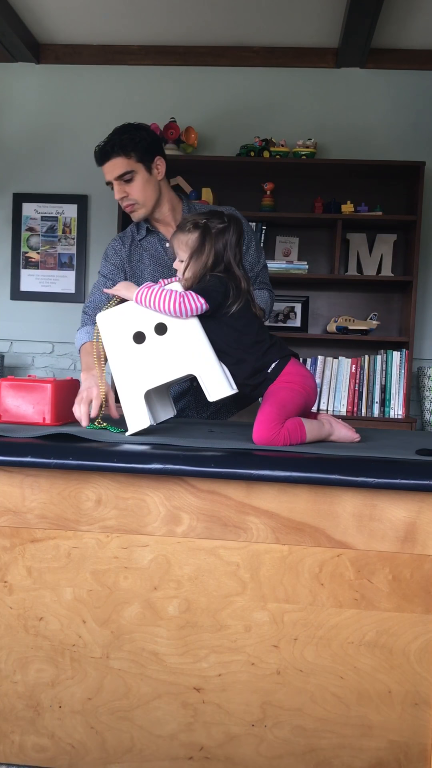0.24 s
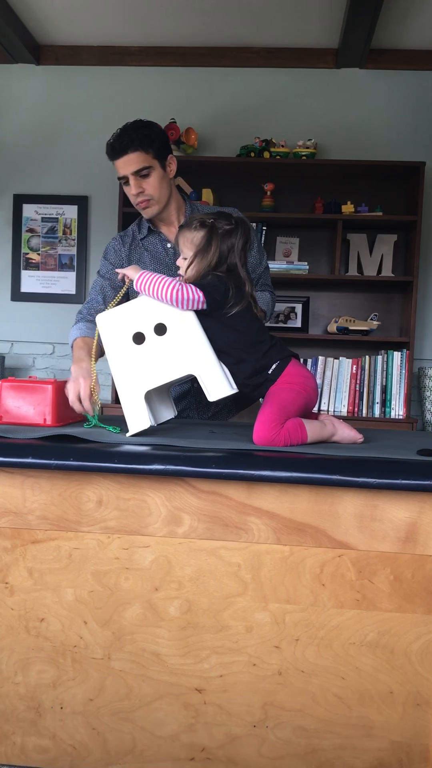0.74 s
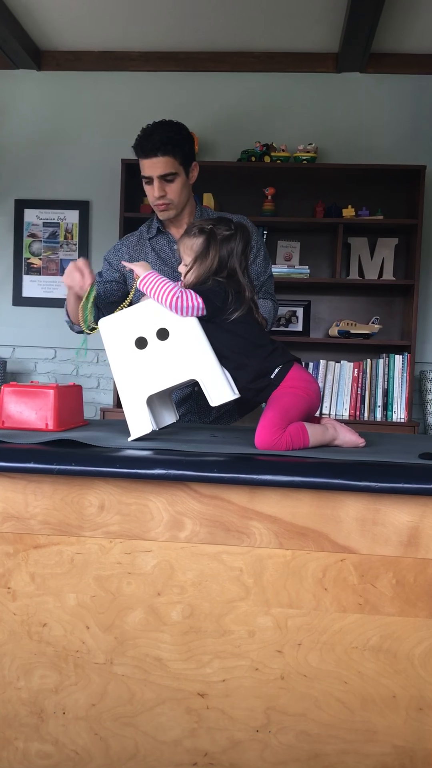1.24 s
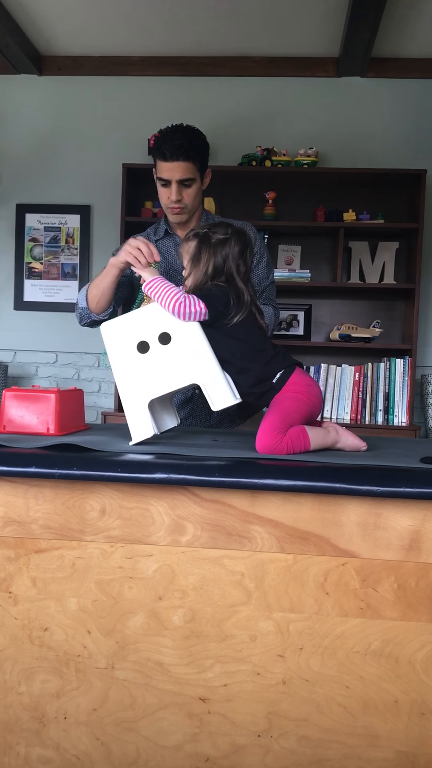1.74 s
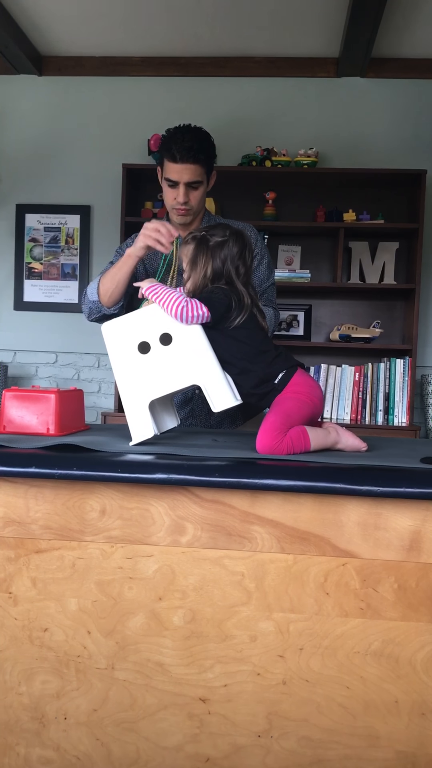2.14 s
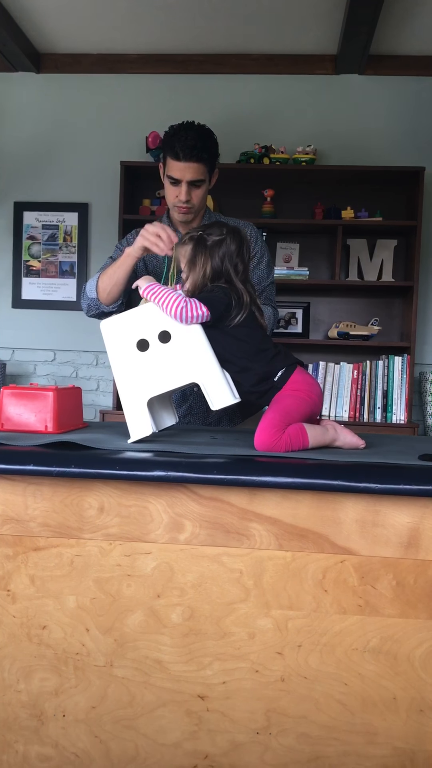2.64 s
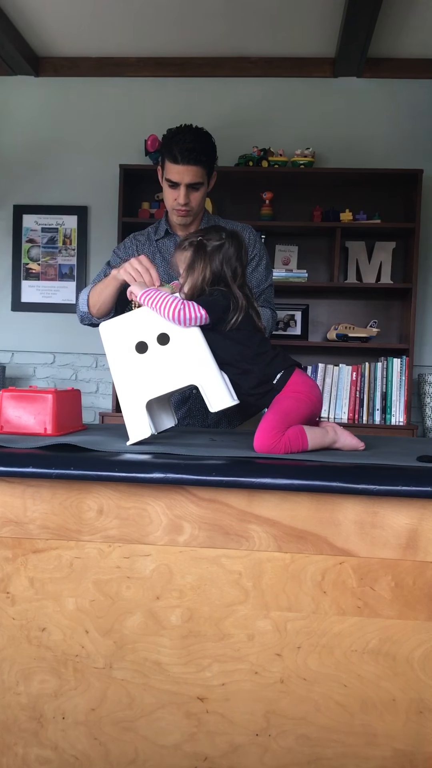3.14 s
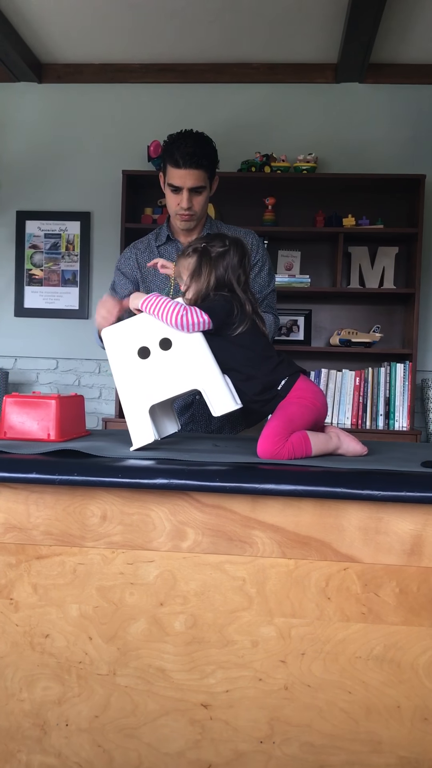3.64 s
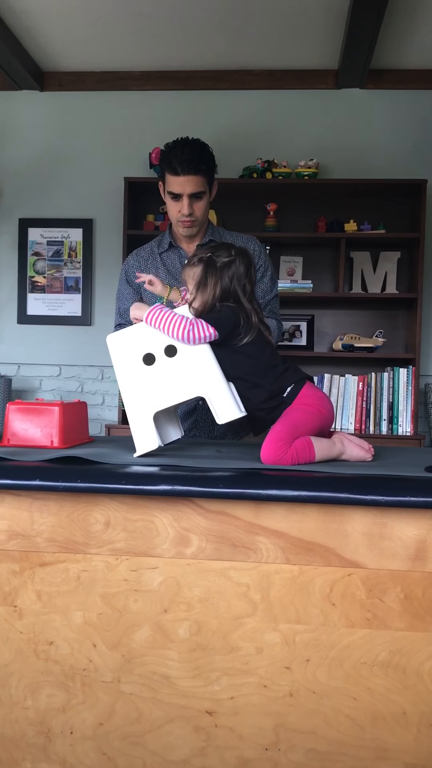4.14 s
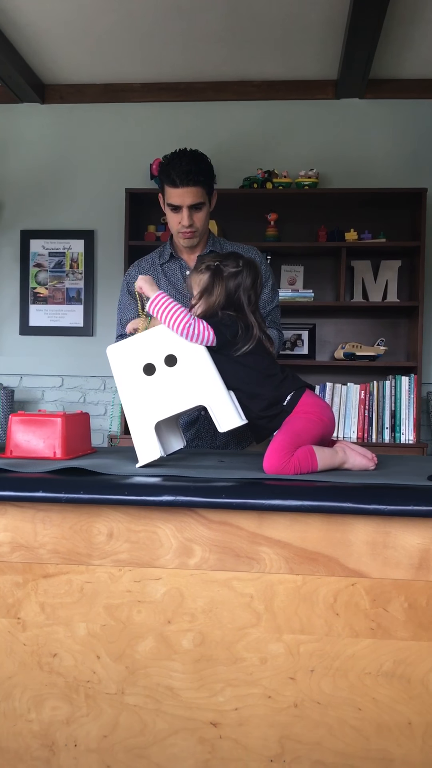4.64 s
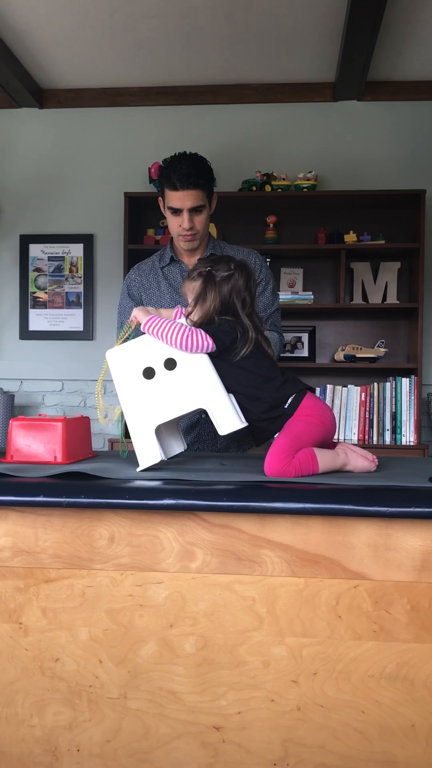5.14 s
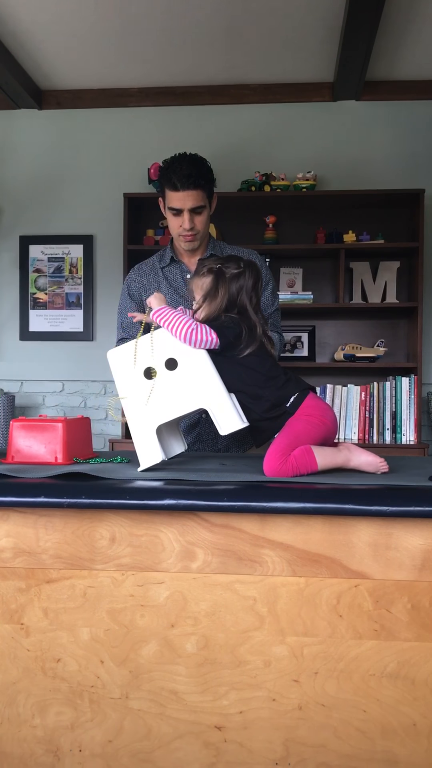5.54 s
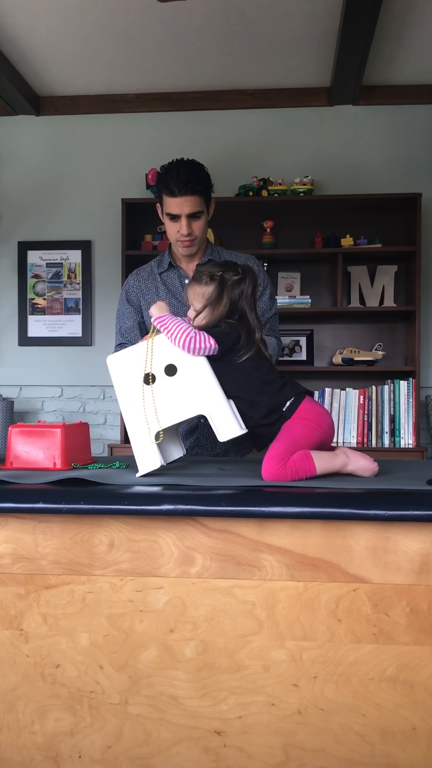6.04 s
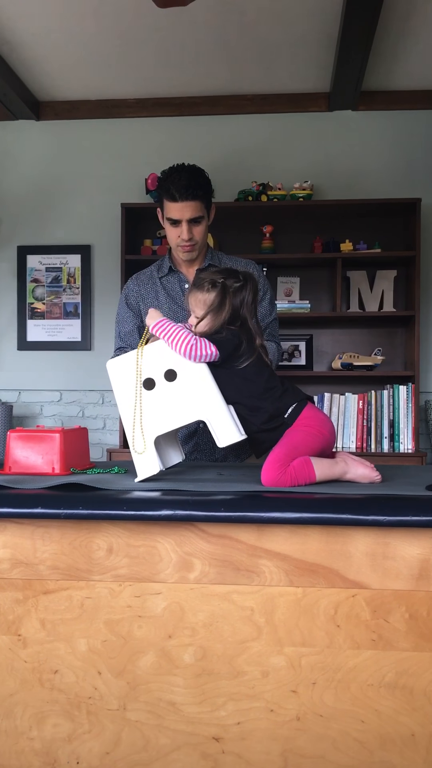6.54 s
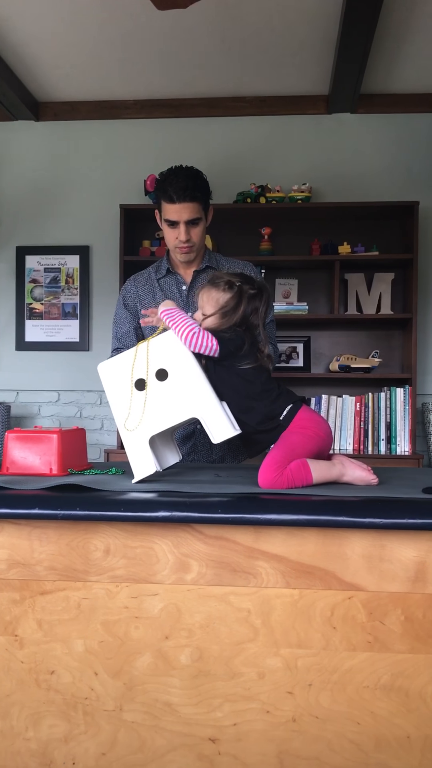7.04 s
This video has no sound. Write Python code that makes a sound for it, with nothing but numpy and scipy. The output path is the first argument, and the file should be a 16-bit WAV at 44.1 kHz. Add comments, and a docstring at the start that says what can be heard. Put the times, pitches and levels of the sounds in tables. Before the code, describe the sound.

Strings of plastic beads slide, rattle and clack on a hollow plastic stool in short clusters, a few metres away in a living room.

```python
"""Strings of beads on a hollow stool

Strings of plastic beads are drawn over a hollow plastic stool and dropped on it or its mat, a few metres away.
Each landing is a quick volley of tiny hard clicks; sliding, jostling and ticking beads are random or lone impacts.
Filters give each contact its colour, and shell modes ring under the clacks, knocks and slides.
Decaying noise smears these clicks as a live living room does, over soft bumps and a low steady rumble."""
import sys
import numpy as np
from scipy import signal
from scipy.fft import rfft, irfft, next_fast_len
from scipy.io import wavfile

SR = 44100
rng = np.random.default_rng(int(sys.argv[2]) if len(sys.argv) > 2 else 0)


def unload_wav(signal):
    """Save mono or channel-first audio to the path in sys.argv[1] as 16-bit WAV at rate SR, clipped to [-1, 1]."""
    wavfile.write(
        sys.argv[1],
        SR,
        np.round(np.clip(np.atleast_2d(signal).T, -1, 1) * 32767).astype(np.int16),
    )


N = 321038


def amp(db):
    """Decibels to amplitude ratio: 20 dB for each factor of ten."""
    return 10 ** (np.asarray(db) / 20)


def unit(x):
    """Normalisation of a signal or spectrum to rms 1."""
    return x / np.sqrt(np.mean(x ** 2) + 1e-20)


def along(points, hz):
    """Linear interpolation of (f/Hz, value) points over log frequency."""
    f, v = np.transpose(points)
    return np.interp(np.log(hz + 1), np.log(f + 1), v)


def filtered(x, response):
    """Linear filtering: the spectrum of x times a complex response of frequency."""
    padded = 2 * next_fast_len(N // 2 + SR // 4)
    spectrum = rfft(x, padded) * response(np.fft.rfftfreq(padded, 1 / SR))
    return irfft(spectrum, padded)[:N]


def resonance(f, hz, width):
    """Frequency response of one damped mode, of gain 1 at its centre; width in Hz."""
    return 1j * f * width / (hz * hz - f * f + 1j * f * width)


def coloured(x, tone, shell_db=None, size=16384):
    """Minimum-phase filtering of unit power; the modal powers of the shell add to the tone."""
    # modes of the stool's shell: f/Hz, width/Hz, level/dB (shell_db is added)
    shell_modes = [(208, 26, -2), (274, 7.7, -1), (348.7, 13, 1.5), (595, 34, -2.5), (838.5, 15, -0.5),
                   (1080, 40, 0), (1188, 31, 2), (1294, 40, -6), (1568, 44, 3), (1755, 82, -1.5),
                   (2107, 76, -3), (2325, 140, -6), (2740, 230, -5), (3040, 86, -2), (3470, 82, -5.5),
                   (4180, 77, -6.5)]
    f = np.fft.rfftfreq(size, 1 / SR)
    gain = amp(along(tone, f))
    if shell_db is not None:
        power = 1
        for hz, width, db in shell_modes:
            power = power + amp(db + shell_db) ** 2 / (1 + (2 * (f - hz) / width) ** 2)
        gain = gain * np.sqrt(power)
    # folding the cepstrum onto positive times makes the ring follow the blow
    cepstrum = irfft(np.log(unit(gain)))
    cepstrum[1:size // 2] *= 2
    cepstrum[size // 2 + 1:] = 0
    impulse_response = irfft(np.exp(rfft(cepstrum)))
    return signal.oaconvolve(x, impulse_response)[:N]


def contacts(rate, scatter_db, clump_db=2.0, clumps_per_s=70):
    """Poisson-like impacts, rate per second, whose force is random and drifts in clumps; rms 1."""
    clumps = np.interp(np.arange(N) / SR * clumps_per_s, np.arange(N), rng.standard_normal(N).clip(-2, 2))
    scatter = rng.standard_normal(N).clip(-2, 2)
    force = amp(clump_db * clumps + scatter_db * scatter) * rng.choice([-1, 1], N)
    return unit(force * (rng.random(N) < rate / SR))


def room(x, build_s=0.00046, count=3):
    """Diffuse reverberation: noise tails decay exponentially, and each bead spot excites its own."""
    # reverberation time: f/Hz, t60/s
    decay_times = [(150, 0.32), (600, 0.39), (2000, 0.33), (6000, 0.3), (10000, 0.25), (16000, 0.26)]
    hz, t, z = signal.stft(rng.standard_normal((count, SR // 2)), SR, nperseg=256)
    decay = amp(-60 * t / along(decay_times, hz)[:, None])
    tails = signal.istft(z * decay, SR)[1]
    tails *= 1 - np.exp(-np.arange(tails.shape[1]) / SR / build_s)
    tails /= np.linalg.norm(tails, axis=1, keepdims=True)
    # another spot is drawn every 48 samples
    spot = rng.integers(count, size=N)[np.arange(N) // 48]
    return sum(signal.oaconvolve(x * (spot == k), tail)[:N] for k, tail in enumerate(tails))


def background():
    """Stationary filtered noise: steady rumble and faint hiss, stronger at low room resonances."""
    # rumble and hiss spectrum: f/Hz, relative level/dB per Hz
    air_tone = [(20, -30), (30, -21), (45, -2), (115, -3), (160, -10), (260, -16.5), (330, -16.5),
                (500, -22.5), (1200, -27), (3000, -31), (6500, -35), (10400, -38.5), (12500, -36),
                (15500, -36)]
    # low room resonances: f/Hz, width/Hz of each of two passes, rms level/dB
    room_modes = [(45.3, 12, -67), (82, 12.4, -67), (105.2, 17, -69), (224, 12.3, -69.5)]
    total = amp(-61.5) * unit(coloured(rng.standard_normal(N), air_tone))
    for hz, width, db in room_modes:
        mode = filtered(rng.standard_normal(N), lambda f: resonance(f, hz, width) ** 2)
        total = total + amp(db) * unit(mode)
    return total


def pulls():
    """Amplitude envelope of sliding: each pull starts, swells or fades evenly in dB, and stops."""
    # the hand draws a string over the stool: t/s, length/s, level/dB at midway before the
    # layer's gains, swell/dB over the pull
    strokes = [(0, 0.52, -78, -11), (0.64, 0.12, -67, 2), (1.3, 0.34, -61, 6.5), (1.694, 0.066, -50, -7),
               (1.847, 0.25, -66, -5), (2.095, 0.28, -56, -8.5), (2.626, 0.11, -54, 2.5),
               (2.773, 0.37, -49, -1), (3.246, .2, -50.5, -9), (3.513, 0.15, -51, 2.5),
               (3.77, 0.023, -51, -7), (3.917, 0.61, -60, -11), (4.445, 0.21, -53, -3),
               (4.759, 0.18, -46.5, -6), (4.972, 0.18, -54.5, -10), (5.269, 0.082, -53, -5),
               (5.593, 0.33, -54, 1.5), (6.008, 0.53, -61, -2), (6.632, 0.2, -60.5, -5),
               (6.875, 0.14, -55.5, -2), (7.106, 0.14, -57.5, 8)]
    attack_s, release_s = 0.074, 0.058  # linear ramps before and after the stroke
    t, strength = np.arange(N) / SR, np.zeros(N)
    for s, length, db, swell_db in strokes:
        attack = 1 + (t - s) / attack_s
        release = 1 - (t - s - length) / release_s
        gate = np.minimum(attack, release).clip(0, 1)
        progress = ((t - s) / length).clip(0, 1)
        strength = np.maximum(strength, gate * amp(db + swell_db * (progress - .5)))
    return strength


def sliding():
    """Impact excitation of modes: beads chatter over the stool's edge and ring its hollow shell."""
    # chatter spectrum without the shell modes: f/Hz, relative level/dB per Hz
    slide_tone = [(80, -24), (200, 2), (450, -9), (900, 1.5), (1600, -1.5), (3000, -3), (4500, -3),
                  (6500, -4), (8000, -10), (10500, -16.5), (16000, -38)]
    chatter = pulls() * contacts(rate=380, scatter_db=4.5, clump_db=3.5, clumps_per_s=55)
    heard = amp(-15.5) * chatter + amp(-1.5) * room(chatter)
    return coloured(heard, slide_tone, shell_db=8.5)


def swings():
    """Amplitude envelope of jostling: a skewed Gaussian gathers to each peak and settles."""
    # hanging strings swing into each other: t/s at the peak, level/dB before the layer's gains,
    # rise/s (the time to climb to the peak from 1/e of it)
    meetings = [(0.021, -63.5, 0.015), (0.603, -53, 0.027), (.75, -66, 0.076), (1.45, -66.5, 0.17),
                (1.625, -49.5, 0.023), (1.69, -47, .015), (1.77, -57, 0.014), (2.062, -55.5, 0.018),
                (2.15, -55.5, 0.053), (2.368, -45.5, 0.0097), (3.07, -54, 0.052), (3.27, -59.5, 0.05),
                (3.53, -52.5, 0.025), (3.965, -60, 0.0074), (4.51, -61, .02), (4.62, -60.5, .025),
                (4.801, -42, 0.028), (5, -50.5, 0.046), (5.117, -47.5, 0.038), (5.32, -52, 0.1),
                (5.59, -45, .025), (5.78, -66, 0.044)]
    settle = 1.24  # settling time over rise time
    t = np.arange(N) / SR
    strength = np.zeros(N)
    for s, db, rise in meetings:
        width = np.where(t < s, rise, settle * rise)
        strength += amp(db) * np.exp(-((t - s) / width) ** 2)
    return strength


def jostling():
    """Random impact noise: swinging or sliding strings brush each other with a bright, uneven rattle."""
    # rattle spectrum: f/Hz, relative level/dB per Hz
    jostle_tone = [(300, -30), (1500, -10.5), (4000, -4), (6500, -2), (7700, -4.5), (9000, -0.5),
                   (10400, -5), (12000, -2), (16000, -4.5)]
    rub_db = -17  # a sliding string also jostles its neighbours, this far below its pull strength
    strength = np.hypot(swings(), amp(rub_db) * pulls())
    rattle = strength * contacts(rate=540, scatter_db=9.0)
    return coloured(amp(-2.5) * rattle + amp(2) * room(rattle), jostle_tone)


def bumps():
    """Damped, low-passing contact: hand and bunched beads push dully on what lies under them."""
    # soft bumps on the mat and stool: t/s at the onset, peak level/dB of the envelope, onset to peak/s
    pushes = [(0.571, -58, 0.046), (1.17, -65, 0.012), (1.677, -62, 0.021), (2.76, -62, 0.031),
              (4.764, -58, 0.022), (5.383, -52, .04), (5.45, -47, 0.013), (5.543, -56, 0.021)]
    t = np.arange(N) / SR
    envelope = np.zeros(N)
    for s, db, length in pushes:
        u = np.maximum(t - s, 0) / length
        envelope += amp(db) * u * np.exp(1 - u)
    dull = filtered(rng.standard_normal(N), lambda f: resonance(f, hz=253, width=420) ** 2)
    return envelope * unit(dull)


def ticks():
    """Impulse excitation: lone, very short bead-on-bead contacts have a bright spectrum."""
    # single beads tick together: t/s, level/dB before the common gain
    bead_contacts = [(0.794, -58), (0.833, -56), (.865, -56), (.894, -56), (.91, -58), (0.939, -55),
                     (0.993, -52.5), (2.818, -42), (3.188, -52), (5.061, -53), (5.449, -39), (6.297, -48)]
    # tick spectrum: f/Hz, relative level/dB per Hz
    tick_tone = [(1000, -36), (4000, -19), (9000, -3), (14000, 0.5)]
    blows = np.zeros(N)
    for s, db in bead_contacts:
        blows[round(s * SR)] = amp(db + 22)
    return coloured(blows + amp(-2) * room(blows, count=1), tick_tone)


def volley(length, fade_db, scatter_db, count=16):
    """Impulse train of unit energy: bead after bead of a string lands, on average ever more softly."""
    place = (np.arange(count) + rng.uniform(-.5, .5, count)).clip(0) / count
    force = amp(-fade_db * place + scatter_db * rng.standard_normal(count)) * rng.choice([-1, 1], count)
    landing = (place * max(length, .002) * SR).astype(int)
    return np.bincount(landing, force / np.linalg.norm(force))


def clacks():
    """Contact stiffness: strings slap the stool or the mat, and harder contacts carry more treble."""
    # a string lands: t/s, level/dB before the common gain, treble/dB, volley length/s (at least
    # 0.002 is used), direct path/dB (low where the stool hides it)
    landings = [(1.1363, -18, -3, .008, -6), (1.568, -38.5, -3, 0.0052, -3.5),
                (1.603, -39.5, 3, 0.017, -3.5), (1.668, -26.5, -6, 0.021, -4.5), (1.844, -47, 7, 0.021, 0),
                (2.101, -31, -16, 0.027, -4), (2.132, -35, -5, 0.0056, -3),
                (2.707, -32, -9.5, 0.0081, -4.5), (2.754, -25.5, -8.5, .02, -6),
                (2.959, -42.5, 3, .012, -5), (3.468, -25.5, 0, 0.0097, -5.5), (3.475, -22, -6, 0.0088, -3),
                (3.668, -34, -2.5, 0.014, -3.5), (3.7504, -31, -5.5, .012, -9),
                (4.692, -33.5, -3.5, 0.0039, -8), (4.76, -25.5, -3, .026, -7),
                (5.271, -35.5, 1, 0.0074, -6), (5.295, -30.5, 2, 0.011, -5), (5.32, -28, -2.5, .012, -3.5),
                (5.37, -25, -5, .003, -10), (5.448, -24, 4.5, 0.0043, -5), (5.456, -24.5, -2, .006, -2.5),
                (5.5513, -20, 0.5, 0.0095, -6.5), (5.56, -24, -17, .007, 0), (5.634, -33, 1.5, 0.0063, -1),
                (5.716, -31, -8.5, 0.0044, -2.5), (5.768, -35, 1.5, .004, -2),
                (5.818, -32, -13, 0.012, -3.5), (5.978, -31.5, -9.5, 0.0074, -8),
                (6.16, -36.5, -12, 0.0092, -0.5), (6.296, -30.5, -5, .003, -2.5),
                (6.616, -41, -2.5, .004, -10)]
    # clack spectrum without the shell modes: f/Hz, relative level/dB per Hz
    clack_tone = [(80, -27.5), (210, -4), (340, -0.5), (470, -14), (600, -0.5), (1100, 1.5), (1800, 0.5),
                  (3000, 0), (6500, 2), (7700, -0.5), (9000, 2), (10400, -3.5), (12000, 0.5), (16000, -3.5)]
    blows, direct = np.zeros((2, N + SR))
    for s, db, treble_db, length, direct_db in landings:
        clicks = amp(db + 19) * volley(length, fade_db=9.5, scatter_db=3)
        soft = signal.lfilter(*signal.butter(1, 3500, fs=SR), clicks)
        force = soft + amp(treble_db) * (clicks - soft)
        start = round(s * SR)
        blows[start:][:len(force)] += force
        direct[start:][:len(force)] += amp(direct_db) * force
    return coloured(direct[:N] + room(blows[:N]), clack_tone, shell_db=3.5)


def knocks():
    """Modal excitation: a heavier, duller blow rings the shell's low modes."""
    # the bunched beads knock on the stool's hollow side: t/s, level/dB before the common gain
    side_blows = [(3.203, -34), (3.476, -23.5), (4.764, -44), (5.318, -25), (5.372, -23), (5.448, -17.5),
                  (5.559, -27)]
    # knock spectrum without the shell modes: f/Hz, relative level/dB per Hz
    knock_tone = [(100, -7), (250, -13), (550, -3.5), (850, 0.5), (1250, -3.5), (1600, -21), (5000, 0)]
    blows = np.zeros(N)
    for s, db in side_blows:
        blows[round(s * SR)] = amp(db + 8.0)
    return coloured(amp(2) * blows + room(blows, count=1), knock_tone, shell_db=23)


def scene():
    """Superposition of the beads, the hand and the room they are in."""
    return (clacks() + knocks() + ticks() + sliding() + jostling() + bumps() + background())[None]


def record(dry):
    """Band limitation: the microphone passes little above a steep edge."""
    top_hz = 15900
    return filtered(dry[0], lambda f: 1 / np.sqrt(1 + (f / top_hz) ** 500))[None]


dry = scene()
out = record(dry)
unload_wav(out)
```